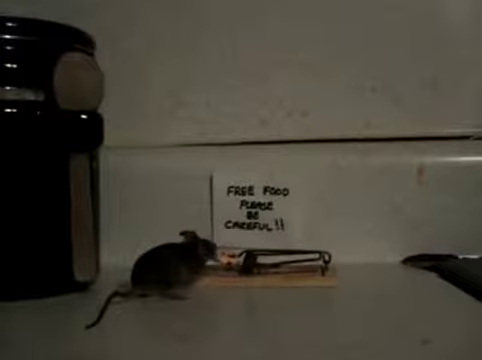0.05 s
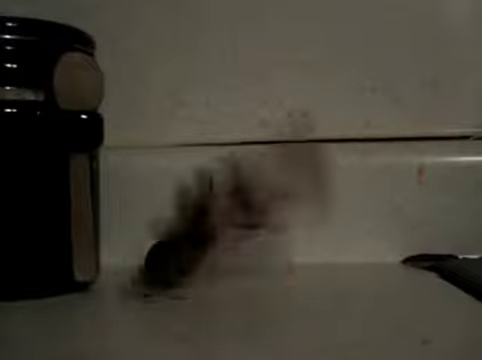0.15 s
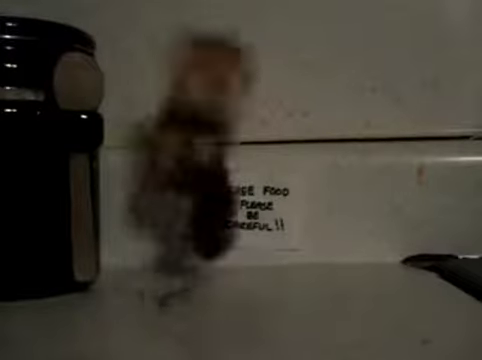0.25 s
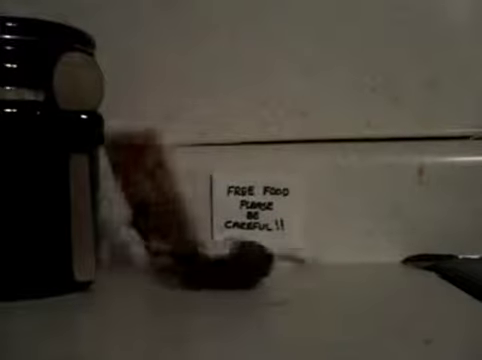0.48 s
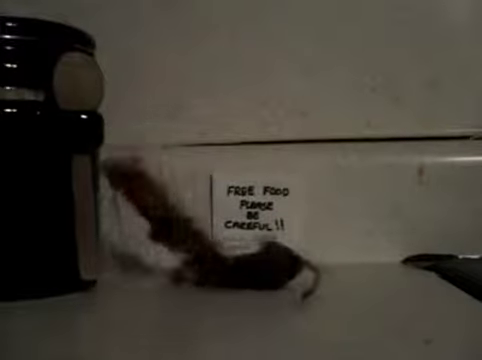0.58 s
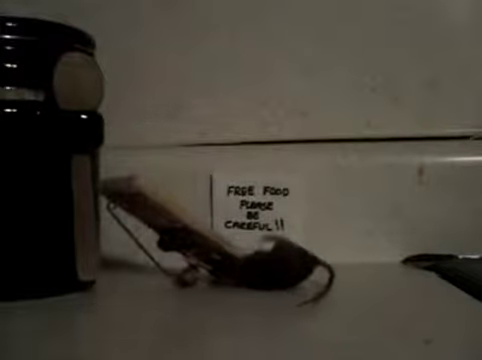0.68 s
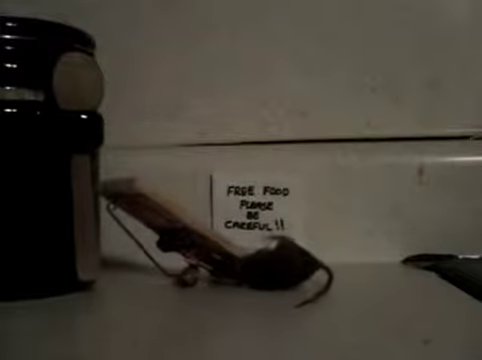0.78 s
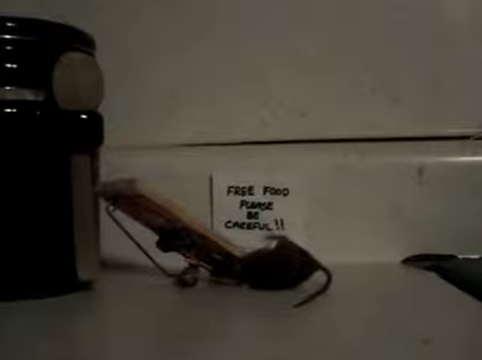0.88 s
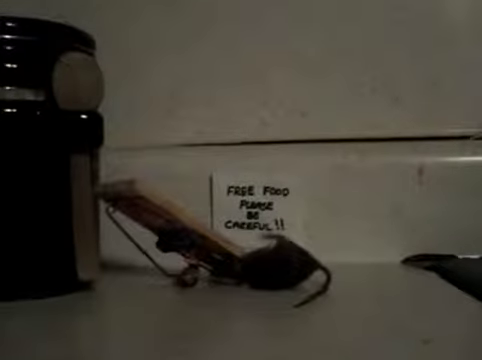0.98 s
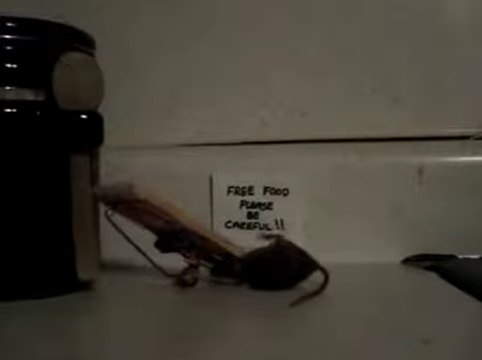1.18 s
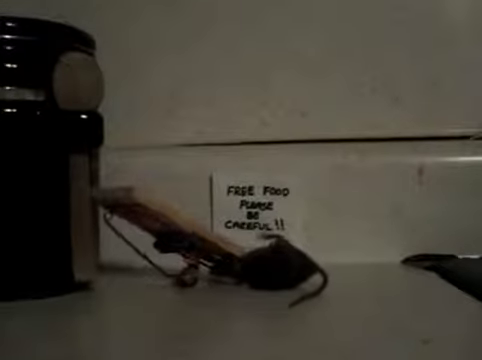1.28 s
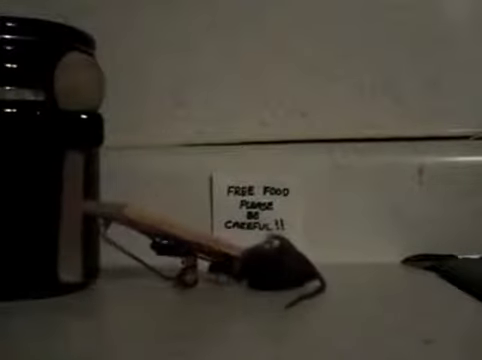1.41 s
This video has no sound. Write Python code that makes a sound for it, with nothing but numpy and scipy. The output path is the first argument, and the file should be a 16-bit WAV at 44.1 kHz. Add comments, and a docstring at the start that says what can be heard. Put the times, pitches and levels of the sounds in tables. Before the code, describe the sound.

A mousetrap snaps loudly with a metallic ring, then lands and clatters.

```python
"""A spring mousetrap fires on a countertop, close to a stereo microphone in a small quiet room.
The bar cracks onto the wooden base, shoving air at the microphone. A metallic ring and the room's echo
hang at a steady level after the snap, then fade. The trap lands with a thud and clatters against a jar
and the counter, each contact rattling the loose wire. Short reflections follow the hits; room tone
and a low hum lie behind."""
import sys
import numpy as np
from scipy import signal
from scipy.fft import rfft, irfft
from scipy.io import wavfile

SR = 44100
rng = np.random.default_rng(int(sys.argv[2]) if len(sys.argv) > 2 else 0)


def transcribe(u):
    """Save the signal u as a 16-bit wav file named by the first command-line argument.

    u: samples, shape (n,) or (channels, n), limited to [-1, 1]; the rate is SR.
    q: integer samples, one column per channel.
    """
    v = np.clip(np.atleast_2d(u).T, -1, 1)
    q = np.round(v * 32767).astype(np.int16)
    wavfile.write(sys.argv[1], SR, q)


N = 63945
T, HZ = np.arange(N) / SR, np.fft.rfftfreq(N, 1 / SR)

# the bar sweeps over and strikes: t/s, level/dB, decay/s
BAR_STRIKES = [(0.2319, -19, 0.012), (0.2355, -19, 0.0048), (0.2382, -14.5, 0.0021), (0.2439, -24, 0.0033),
               (0.2457, -14, 0.0045), (0.2513, -31, 0.0026), (0.273, -28, 0.0086), (0.2794, -25.5, 0.0028)]
# spectrum of a strike: f/Hz, level/dB per Hz
BAR_SPECTRUM = [(40, 1.5), (200, -7), (700, -1), (1400, 3.5), (3000, 1.5), (4500, -4.5), (7500, -3.5),
                (10000, -7.5), (14000, -11.5)]
# ring of the released spring: f/Hz, level/dB
SPRING_MODES = [(1597, -15.5), (1960, -10.5), (2131, -9.5), (2310, -5), (2694, -29), (2870, -7.5),
                (2936, -2), (2996, -1), (3064, -8), (3117, -2), (3790, -10.5), (6168, -19.5), (7207, -8.5),
                (7433, -9), (7741, -6)]
# its dense upper modes and their echo: f/Hz, level/dB per Hz
SHIMMER_SPECTRUM = [(70, -70), (110, -24), (200, -65), (430, -24), (1000, -17.5), (1500, -18.5), (2200, -5),
                    (2550, -6.5), (2850, -0.5), (3120, 0), (3450, -10.5), (3850, -6.5), (4500, -14.5),
                    (5200, -10.5), (6400, -12), (7700, -6), (9000, -11), (12000, -22), (14500, -55)]
# how fast ring and echo fade after the hold: f/Hz, fall/dB per s
RING_FADE = [(200, 48), (1600, 81), (3000, 125), (7500, 112), (14000, 168)]
# air shoved by the base as it kicks off and lands: t/s, peak/dB, half width/s
AIR_PUSHES = [(0.2402, -11.5, 0.0004), (0.2451, -25, 0.00062), (0.2470, -28, 0.0035),
              (0.5519, -17.5, 0.00027)]
# dull blows on the counter: t/s, level/dB, decay/s, low edge/Hz, high edge/Hz, left-right correlation
COUNTER_THUDS = [(0.2389, -15.5, 0.0054, 101, 1150, -0.28), (0.2453, -23, 0.0072, 30, 357, -0.085),
                 (0.460, -42, 0.06, 117, 710, 0.4), (0.484, -43, 0.022, 89.5, 397, 0.52),
                 (0.5533, -27, 0.014, 200, 910, 0.67), (0.617, -38.5, 0.0076, 30, 110, .6),
                 (0.765, -42, 0.0083, 250, 1000, .6), (0.828, -40.5, 0.0039, 201, 710, 1)]
# the counter booms: t/s, level/dB, length/s
COUNTER_BOOMS = [(0.476, -38, 0.043), (0.522, -34.5, 0.049)]
# the trap tumbles: t/s, click/dB, spot ring/dB, spot ring f/Hz, decay/s, wire ring/dB
CONTACTS = [(0.28, -34, -22, 1330, 0.0037, -47), (0.449, -46, -29, 1320, 0.0065, -48),
            (0.4596, -19.5, -12.5, 1690, .0018, -29), (0.4614, -29, -58, 10900, 0.016, -44),
            (0.4746, -19, -25, 7700, 0.0016, -50), (0.4830, -22.5, -15.5, 1570, 0.0023, -42),
            (0.4832, -46, -15, 4700, 0.0017, -38), (0.4865, -25, -23.5, 1570, 0.0048, -32.5),
            (0.5058, -39, -21, 7800, 0.0023, -32), (0.5118, -28.5, -40, 9400, 0.012, -44),
            (0.5537, -22, -25, 1760, 0.0029, -51), (0.5598, -24, -31, 6650, 0.0056, -32),
            (0.5690, -30, -22, 7900, 0.0045, -39), (0.5771, -28, -39, 2920, 0.012, -27.5),
            (0.604, -24.5, -55, 11400, 0.0047, -60), (0.6094, -59, -28, 1163, 0.0062, -36.5),
            (0.619, -36, -20, 10600, 0.0028, -40), (0.6250, -34, -20, 5470, 0.0042, -49),
            (0.6290, -23.5, -23.5, 3060, 0.0043, -43), (0.6342, -30, -34, 7900, 0.0099, -29.5),
            (0.6430, -29.5, -35.5, 2920, 0.02, -36), (0.651, -40, -40, 3030, 0.0044, -40),
            (0.6686, -30.5, -29.5, 1690, 0.017, -40), (0.6880, -27.5, -28, 7000, 0.012, -29.5),
            (0.707, -34.5, -35.5, 1980, 0.02, -42), (0.73, -38, -36, 7600, 0.0074, -36),
            (0.7524, -27.5, -18, 2500, 0.0032, -35), (0.7744, -25.5, -25.5, 7600, .003, -37),
            (0.7779, -22.5, -45, 7900, 0.0033, -55), (0.785, -36, -40, 10400, 0.0041, -68),
            (0.837, -59, -37.5, 1630, .005, -56), (0.852, -70, -40.5, 1270, 0.0087, -69),
            (0.86, -62, -40, 1800, 0.0076, -61), (0.865, -60, -40.5, 980, 0.0089, -60)]
# spectrum of a contact's click: f/Hz, level/dB per Hz
CLICK_SPECTRUM = [(60, -11), (400, -12.5), (900, -6.5), (1600, 6), (3000, 1), (4500, -0.5), (8000, -6),
                  (11000, 2), (14000, -11.5)]
# ring of the loose wire parts: f/Hz, level/dB, t60/s
WIRE_MODES = [(1141, -14.5, 0.21), (1588, -7.5, 0.3), (1563, -3.5, 0.34), (1620, -7.5, .25),
              (1840, -12, 0.39), (3026, 0.5, 0.081), (3140, -5.5, 0.18), (3340, -9, 0.096),
              (5570, -10, 0.22), (6870, -10, 0.26), (7770, -1, 0.13), (8480, -7, 0.2)]
# reverberation of the small room: f/Hz, t60/s
ROOM_T60 = [(60, .1), (200, 0.6), (1000, 0.41), (4000, 0.45), (8000, 0.31), (14000, 0.17)]
# room tone: f/Hz, level/dB per Hz
AIR_SPECTRUM = [(15, -43), (28, -33), (58, -14), (85, -6), (129, -31), (168, -10), (293, -10), (403, -8),
                (539, -10.5), (761, -11), (1400, -15), (2500, -25.5), (5000, -30), (10500, -33),
                (13000, -48)]
# appliance hum in the background: f/Hz, level/dB
HUM_PARTIALS = [(48, -62.5), (60, -63), (120, -66), (299, -64), (360, -63.5), (754, -67), (1367, -68.5),
                (2789, -71.5)]
# stereo image of each source at the microphone: f/Hz, left-right correlation
BAR_IMAGE = [(40, .5), (110, -0.56), (300, 0), (900, 0.3), (1800, 0.83), (8000, 0.92)]
RING_IMAGE = [(100, 0), (600, 0.83), (3000, 0.4), (8000, .62), (14000, 0.8)]
CONTACT_IMAGE = [(200, 0.48), (1600, 0.85), (3500, 0.61), (8000, .78), (14000, 0.7)]
AIR_IMAGE = [(40, 0.46), (400, .55), (900, 0.44), (1800, 0.088), (3500, -0.2), (8000, 0.34)]
# channel balance of the microphone: f/Hz, left minus right/dB
MIC_BALANCE = [(30, -5), (120, 2.5), (250, -3), (1000, -5), (2500, -3.5), (5000, -2.5), (12000, -0.5)]


def bar_snap():
    """The catch lets go and the bar hits the base in a tight cluster of cracks, close up."""
    out = np.zeros((2, N))
    for s, db, decay in BAR_STRIKES:
        add(out, s, amp(db) * burst(lambda f: amp(read(BAR_SPECTRUM, f)), decay, BAR_IMAGE))
    return out


def ring_envelope(t, hz, fire_s=0.2338, rise_s=0.0043, hold_s=0.17):
    """The snap's metallic ring and room tail rise, stay level as if held by a limiter, then die away."""
    age = np.maximum(t - fire_s, 0)
    fall_db = read(RING_FADE, hz) * np.maximum(age - hold_s, 0)
    return np.minimum(age / rise_s, 1) * amp(-fall_db)


def metallic_ring(modes_db=-26.5, shimmer_db=-21.5):
    """Beating steel modes ring after the snap, in a dense shimmer of upper modes and room echo."""
    modes = sum(amp(db) * beating_tone(hz, RING_IMAGE, waver=1, spread_hz=0.011 * hz)
                * ring_envelope(T, hz) for hz, db in SPRING_MODES)
    modes /= np.linalg.norm([amp(db) for _, db in SPRING_MODES])
    kick_db = 6 * np.exp(-((T - 0.253) / 0.0074) ** 2)  # loudest just after the bar has landed
    dense_modes = noise(lambda f: amp(read(SHIMMER_SPECTRUM, f) + ripple(f)), N, RING_IMAGE)
    hz, t, bands = signal.stft(dense_modes, SR, nperseg=256)
    shimmer = signal.istft(bands * ring_envelope(t, hz[:, None]), SR, nperseg=256)[1][:, :N]
    return amp(modes_db + kick_db) * modes + amp(shimmer_db) * shimmer


def air_pushes():
    """The base shoves air at the microphone: single swings of pressure, up then down."""
    return sum(amp(db) * (s - T) / width * np.exp(.5 - .5 * ((T - s) / width) ** 2)
               for s, db, width in AIR_PUSHES)


def counter_thuds(boom_hz=101):
    """The trap's body thuds on the countertop, which booms in its lowest mode."""
    out = np.zeros((2, N))
    for s, db, decay, low_hz, high_hz, correlation in COUNTER_THUDS:
        def band(f):
            return f ** 2 / (f ** 2 + low_hz ** 2) / (1 + (f / high_hz) ** 4)
        add(out, s, amp(db) * burst(band, decay, [(high_hz, correlation)]))
    for s, db, length in COUNTER_BOOMS:
        t = T[:round(length * SR)]
        swell = np.sin(np.pi * t / length)[None]
        add(out, s, amp(db) * swell * np.sin(2 * np.pi * boom_hz * t))
    return out


def clatter():
    """Each contact with the jar or the counter clicks and rings the spot that was hit."""
    out = np.zeros((2, N))
    for s, click_db, spot_db, spot_hz, decay, _ in CONTACTS:
        width = .2 * (.004 / decay) ** 0.67  # share of the pitch: longer rings are purer
        click = burst(lambda f: amp(read(CLICK_SPECTRUM, f)), decay, CONTACT_IMAGE)
        ring = burst(lambda f: 1 / (1 + (np.log((f + 1) / spot_hz) / width) ** 2), decay, CONTACT_IMAGE)
        add(out, s, amp(click_db) * click + amp(spot_db) * ring)
    return out


def wire_rattle():
    """Every contact feeds energy into the loose wire, whose modes rattle and die away."""
    feed = np.zeros(N)
    for s, *_, wire_db in CONTACTS:
        feed[round(s * SR)] += amp(wire_db) ** 2 / 2
    out = np.zeros((2, N))
    for hz, db, t60 in WIRE_MODES:
        kept_per_sample = amp(-60 / (t60 * SR)) ** 2
        energy = signal.lfilter([1], [1, -kept_per_sample], feed)
        out += amp(db) * np.sqrt(energy) * beating_tone(hz, CONTACT_IMAGE, waver=2.4, spread_hz=.036 * hz)
    return out


def room_reflections(hits, level_db=-9.5):
    """The small room returns sparse reflections, each band dying at its own speed."""
    taps = rng.standard_normal((3, SR // 2)) * (rng.random((3, SR // 2)) < .1)
    stereo_taps = taps[:2] + 0.92 * taps[2]  # the third row reaches both channels alike
    hz, t, bands = signal.stft(stereo_taps, SR, nperseg=256)
    tail = signal.istft(bands * amp(-60 * t / read(ROOM_T60, hz)[:, None]), SR, nperseg=256)[1]
    tail /= np.linalg.norm(tail, axis=1, keepdims=True)
    return amp(level_db) * signal.fftconvolve(hits, tail, axes=1)[:, :N]


def room_tone(air_db=-53):
    """A wavering appliance hum and soft air noise, well behind the trap."""
    hum = sum(amp(db) * beating_tone(hz, AIR_IMAGE, waver=0.44, spread_hz=11) for hz, db in HUM_PARTIALS)
    return hum + amp(air_db) * noise(lambda f: amp(read(AIR_SPECTRUM, f)), N, AIR_IMAGE)


def burst(colour, decay, image, attack_s=0.00013, size=4096):
    """A contact: many modes start at once and die quickly."""
    t = T[:size]
    envelope = (1 - np.exp(-t / attack_s)) * np.exp(-t / decay)
    modes = noise(lambda f: colour(f) * amp(ripple(f)), size, image)
    return unit(modes * envelope) * np.sqrt(decay * SR / (2 * size))  # energy grows with the decay


def ripple(hz, depth_db=3, spacing_hz=60.2):
    """Modes bunch unevenly: random peaks and gaps along the spectrum, in dB."""
    knots = np.arange(0, SR, spacing_hz)
    return depth_db * np.interp(hz, knots, unit(rng.random(4096) - .5)[:len(knots)])


def beating_tone(hz, image, waver, spread_hz):
    """A tone beats against close partials of relative strength waver; rms 1."""
    partials = noise(lambda f: np.exp(-((f - hz) / spread_hz) ** 2), 65536, image)[:, :N]
    phase_gap = np.arccos(np.clip(read(image, hz), -1, 1))  # between left and right
    phase = 2 * np.pi * rng.random() + phase_gap * rng.choice([-.5, .5]) * np.array([[1], [-1]])
    return unit(np.sqrt(2) * np.cos(2 * np.pi * hz * T + phase) + waver * partials)


def noise(colour, size, image):
    """Mid-side noise of rms 1, shaped by the gain colour(f)."""
    hz = np.fft.rfftfreq(size, 1 / SR)
    mid, side = np.exp(2j * np.pi * rng.random((2, len(hz))))
    correlation = np.clip(read(image, hz), -1, 1)
    mid, side = mid * np.sqrt(1 + correlation), side * np.sqrt(1 - correlation)
    return unit(irfft(np.array([mid + side, mid - side]) * colour(hz), size))


def amp(db):
    """Decibels to gain."""
    return 10 ** (np.asarray(db) / 20)


def unit(x):
    """Scales to rms 1."""
    return x / np.sqrt(np.mean(abs(x) ** 2) + 1e-20)


def read(points, hz):
    """Reads a table on a log-frequency axis."""
    f, value = np.transpose(points)
    return np.interp(np.log(hz + 1), np.log(f + 1), value)


def add(mix, s, sound):
    """Mixes a stereo sound in at s seconds."""
    part = mix[:, round(s * SR):][:, :sound.shape[1]]
    part += sound[:, :part.shape[1]]


def scene():
    """The trap up close, the room's answer to its sharp hits, and the room tone behind."""
    hits = bar_snap() + clatter()
    return (hits + room_reflections(hits) + counter_thuds() + air_pushes()
            + metallic_ring() + wire_rattle() + room_tone())


def record(dry, overload=0.6, low_hz=20, high_hz=14600):
    """The stereo microphone leans a little to the right, overloads softly and limits the band."""
    balance_db = np.outer([.5, -.5], read(MIC_BALANCE, HZ))
    heard = irfft(rfft(dry) * amp(balance_db), N)
    heard = heard / (1 + (heard / overload) ** 4) ** .25
    heard = signal.sosfilt(signal.butter(1, low_hz, "high", fs=SR, output="sos"), heard)
    lowpass = signal.firwin(255, high_hz, window=("kaiser", 9), fs=SR)
    return signal.oaconvolve(heard, lowpass[None], "same")


dry = scene()
out = record(dry)
transcribe(out)
```